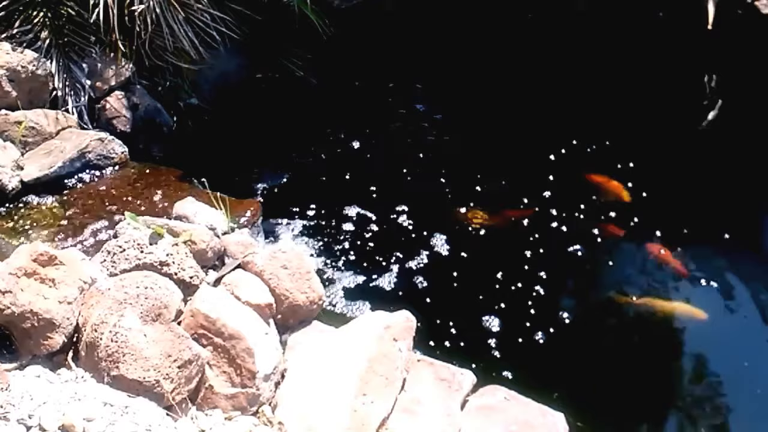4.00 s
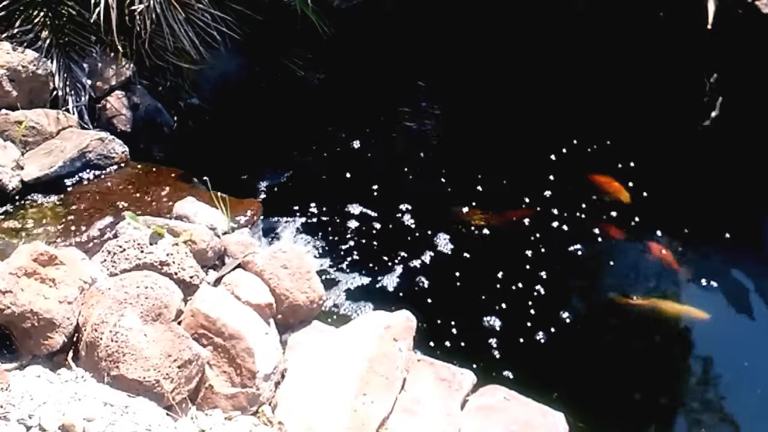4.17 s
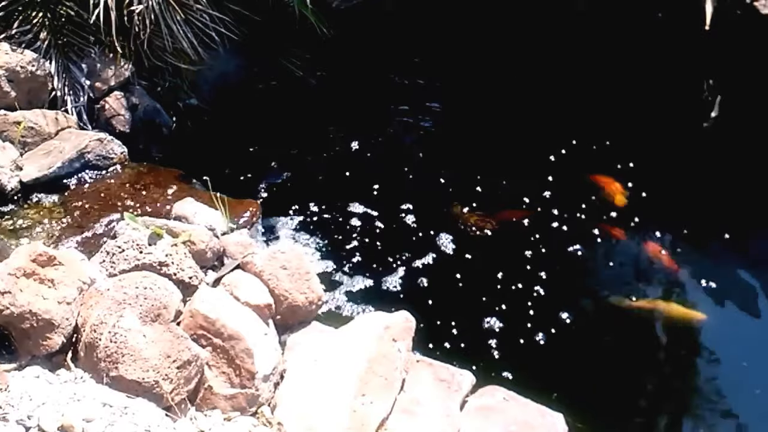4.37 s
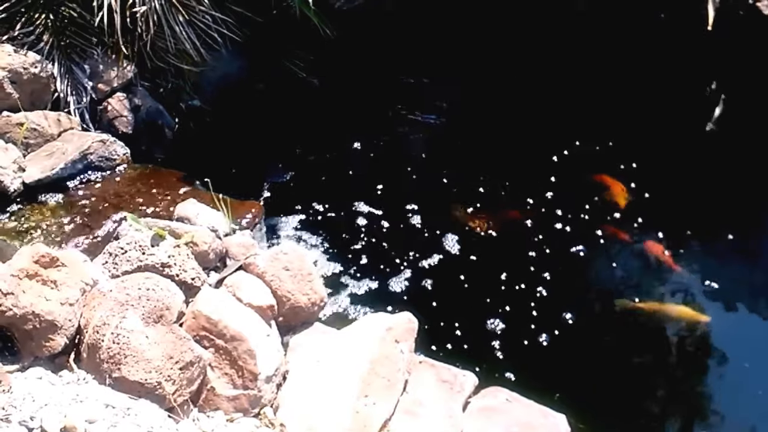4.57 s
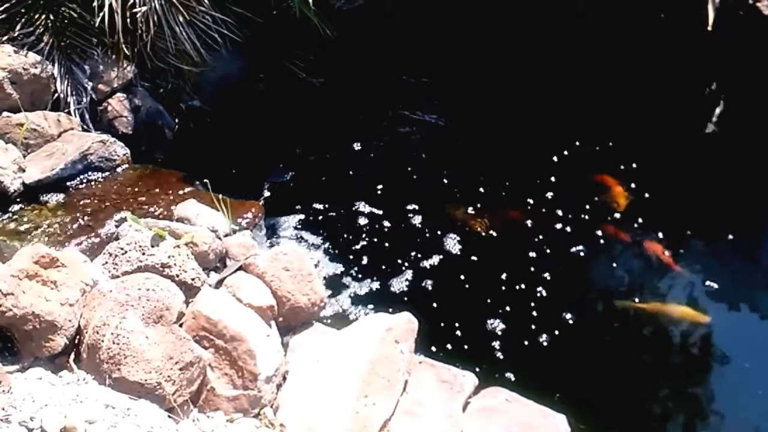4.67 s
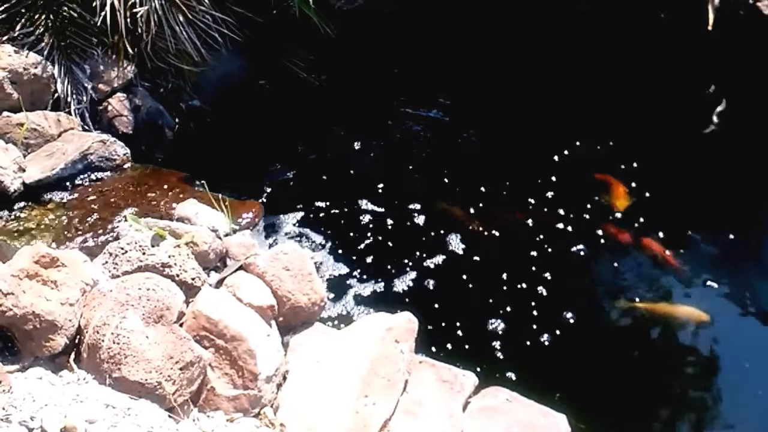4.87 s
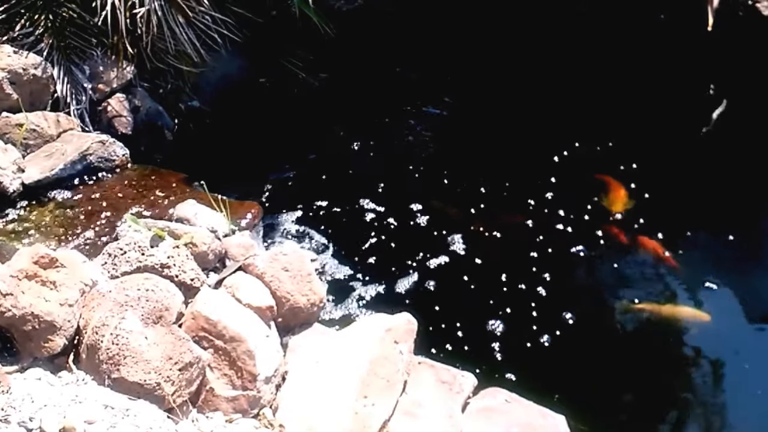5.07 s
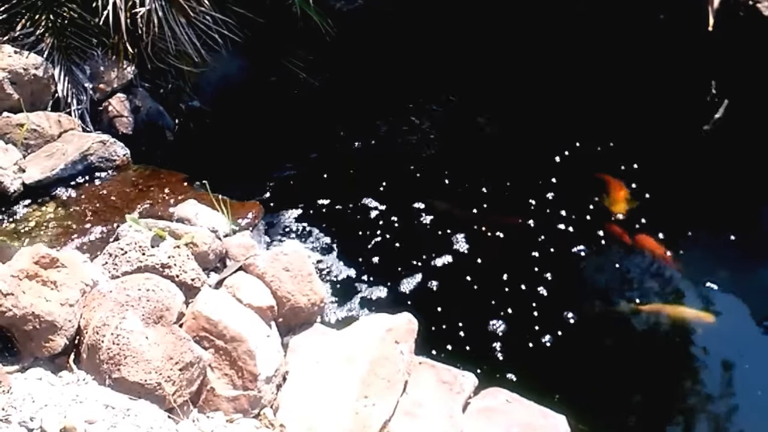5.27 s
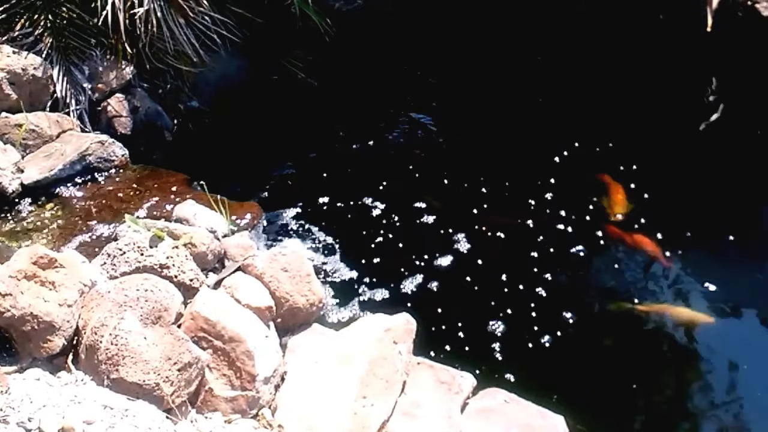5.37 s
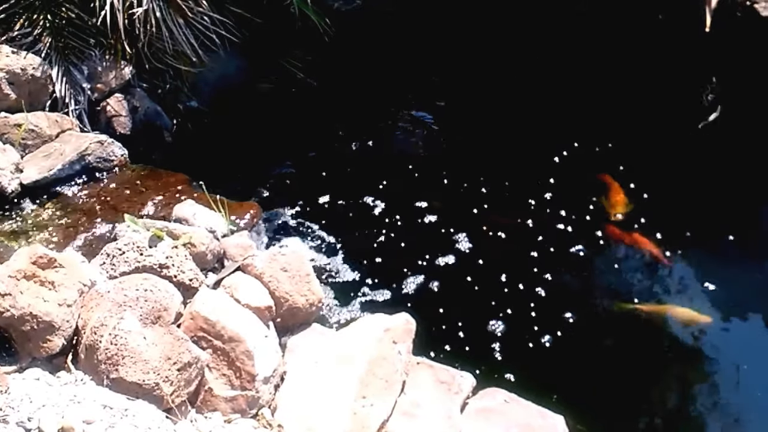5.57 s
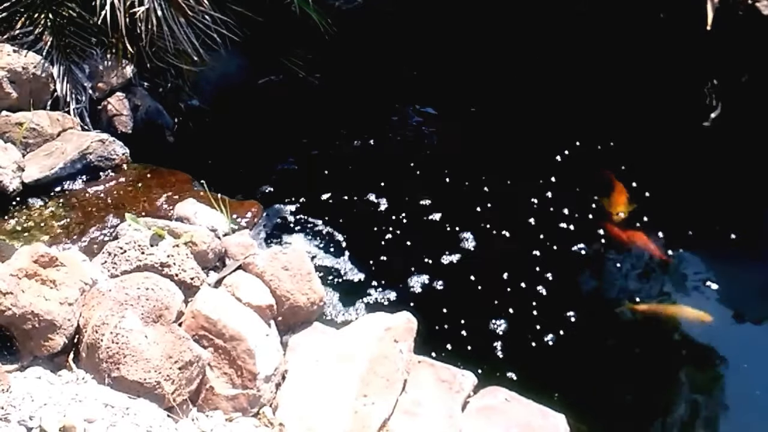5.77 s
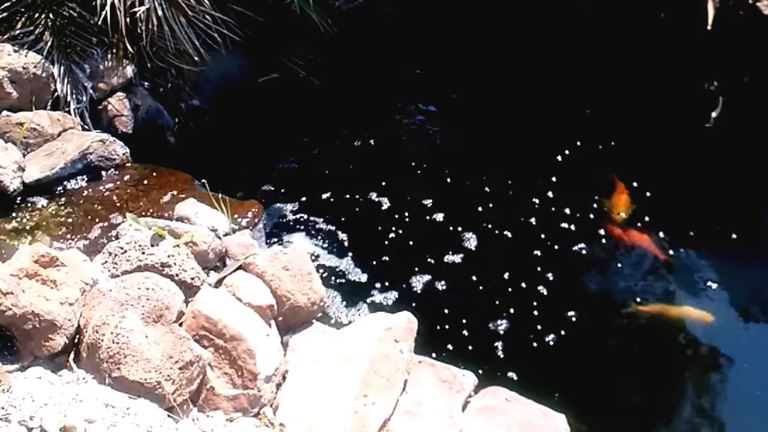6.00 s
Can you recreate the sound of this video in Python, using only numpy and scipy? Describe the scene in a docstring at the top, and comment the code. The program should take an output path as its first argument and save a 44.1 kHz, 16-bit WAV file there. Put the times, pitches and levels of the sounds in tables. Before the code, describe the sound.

Water runs constantly into a pond, gurgling and splashing without pause, dotted with round bubble tones, quick drop bursts and weak hissing spray. Strong low wind thumps and flutter cover the opening, then thin out near three seconds, leaving the water clearer, with milder gusts afterwards. Outdoors, fairly near the water, captured by a dull small camera microphone in mono.

```python
"""A small garden waterfall rushes and gurgles over rocks into a pond, with plops, bursting drops and windy rumble.
The water is noise mixed with swarms of small ringing bubbles; larger bubbles are single rising tones.
Drops burst as short puffs of noise; wind buffets, flutters and thumps at the microphone.
The small camera microphone is dull: it samples slowly and joins its samples by straight lines,
which leaves faint mirror bands in the treble."""
import sys
import numpy as np
from scipy import signal
from scipy.fft import rfft, irfft, next_fast_len
from scipy.io import wavfile
from scipy.ndimage import uniform_filter1d

SR = 44100
rng = np.random.default_rng(int(sys.argv[2]) if len(sys.argv) > 2 else 0)


def pcm_store(signal):
    """Save signal as 16-bit PCM."""
    levels = np.round(np.clip(np.atleast_2d(signal), -1, 1) * 32767)
    wavfile.write(sys.argv[1], SR, levels.astype(np.int16).T)


def decibels_to_gain(level_db):
    """Convert a level in decibels to a linear amplitude gain (20 dB per decade)."""
    exponent = np.asarray(level_db, float) / 20
    return 10 ** exponent


N = 266099   # length in samples

# how strongly the water falls: (t/s, splash level/dB, churn level/dB)
FALL_LEVELS = [(0.0, -49, -46.5), (0.72, -49, -43), (1.0, -50, -45.5), (1.25, -49.5, -42),
               (1.8, -49.5, -41), (2.2, -48.5, -43), (2.55, -47.5, -40), (3.0, -48, -40.5),
               (3.6, -47.5, -40.5), (4.3, -49, -43.5), (5.2, -49.5, -45), (6.03, -49, -44)]
MIST_DB = -74


def waterfall():
    """Falling water churns the pool, splashes on rocks and throws a steady mist and surges of spray."""
    splash_db, churn_db = in_time(FALL_LEVELS)
    body = decibels_to_gain(churn_db) * churn() + decibels_to_gain(splash_db) * splash()
    spray = decibels_to_gain(MIST_DB) * mist() + surge_strength() * surge_spray()
    return body + spray


# colour of the low churn: (f/Hz, relative level/dB per Hz)
CHURN_COLOUR = [(65, -42.5), (110, 1), (193, -1.5), (252, -0.5), (600, -14.5), (780, -53), (1320, -120)]


def churn():
    """Water plunging into the pool stirs low noise and traps large, low bubbles."""
    bubbles = swarm(100, 650, 200.0, cycles=35.0, size_db=0.8, clump_db=0.37)
    return water(CHURN_COLOUR, bubbles, share=0.4, patchy_db=1.6)


# colour of the splashing: (f/Hz, relative level/dB per Hz)
SPLASH_COLOUR = [(260, -43), (450, -3), (611, -4), (765, -2), (922, -7.5), (1100, -7), (1450, -9),
                 (1740, -17.5), (2200, -38), (2860, -62.5), (4840, -120)]


def splash():
    """Water breaking on the rocks makes noise and short bubble rings, with longer gurgles among them."""
    bubbles = swarm(414.4, 2410, 300.0, cycles=30.0, size_db=1.5, clump_db=2.5)
    gurgles = swarm(420, 2300, 150.0, cycles=88.0, size_db=1.0, clump_db=1.5)
    return water(SPLASH_COLOUR, bubbles + decibels_to_gain(-6.0) * gurgles, share=0.4, patchy_db=1.7)


# colour of the steady mist: (f/Hz, relative level/dB per Hz)
MIST_COLOUR = [(1120, -30), (1900, -6), (2190, -11.5), (2290, -10), (2480, -6.5), (3050, -4.5), (3960, -9),
               (6710, -120)]


def mist():
    """Steady fine spray: a high hiss with tiny, long-ringing bubbles in it."""
    bubbles = swarm(1800, 4300, 300.0, cycles=220.0, size_db=-1.0, clump_db=0.0)
    return water(MIST_COLOUR, bubbles, share=0.28, patchy_db=2.0)


# colour of the surging spray: (f/Hz, relative level/dB per Hz)
SURGE_HUE = [(2200, -10.5), (2700, -10), (3100, -3), (3500, -8.5), (4000, -10)]


def surge_spray():
    """The spray thrown in surges: hiss and tiny ringing bubbles, before the surges shape its strength."""
    bubbles = swarm(2100, 4200, 250.0, cycles=130.0, size_db=1.0, clump_db=0.5)
    return water(SURGE_HUE, bubbles, share=0.45, patchy_db=0.5)


# surges of fine spray: (crest t/s, level/dB, build-up by a factor e t/s, dying by 60 dB t/s)
SPRAY_SURGES = [(0.19, -74, 0.035, 0.42), (0.74, -72.5, .03, 0.36), (0.9, -76.5, 0.025, .5),
                (1.04, -66.5, .015, 0.7), (1.408, -68.5, 0.054, 0.18), (2.0, -68.5, 0.069, 0.46),
                (2.2, -72, 0.016, .6), (2.24, -66.5, 0.017, 0.98), (2.53, -70, 0.031, 1),
                (3.35, -68, .015, 0.52), (3.419, -74, 0.036, 1.3), (3.749, -71, 0.15, 1),
                (4.06, -69.5, 0.065, 0.33), (4.38, -80, 0.022, 0.25), (4.54, -67.5, 0.059, 0.45),
                (4.83, -73, .04, 0.51), (5.04, -71.5, 0.023, 0.22), (5.51, -67, 0.035, 0.45),
                (5.629, -70.5, 0.032, 0.36), (5.89, -75, .07, 0.73)]


def surge_strength():
    """Each surge of spray builds up to its crest and dies away; overlapping surges add in power."""
    t = np.arange(N) / SR
    power = np.zeros(N)
    for crest, db, build_s, t60 in SPRAY_SURGES:
        rising = np.exp(2 * np.minimum(t - crest, 0) / build_s)
        dying = decibels_to_gain(-120 * np.maximum(t - crest, 0) / t60)
        power += decibels_to_gain(2 * db) * np.where(t < crest, rising, dying)
    return np.sqrt(power)


def water(spectrum, bubbles, share, patchy_db):
    """Rushing noise of wavering strength and a bubble swarm share one colour; share is the bubbles' power."""
    share = np.clip(share, 0, 1)
    rush = rng.standard_normal(N) * decibels_to_gain(patchy_db * drift(1.6))
    return np.sqrt(1 - share) * colour(rush, spectrum) + np.sqrt(share) * colour(bubbles, spectrum)


def swarm(low_hz, high_hz, per_s, cycles, size_db, clump_db):
    """Small bubbles born at random in clumps; each falls 60 dB in the given cycles; equal power per Hz."""
    sizes = decibels_to_gain(size_db * np.minimum(rng.exponential(1, N), 5)) * rng.choice([-1, 1], N)
    born = rng.random(N) < per_s * decibels_to_gain(clump_db * drift(9.0)) / SR
    pitch_number = rng.integers(0, 24, N)
    out = np.zeros(N)
    for k, hz in enumerate(np.geomspace(low_hz, high_hz, 24)):
        r = decibels_to_gain(-60 * hz / (cycles * SR))   # decay in one sample
        w = 2 * np.pi * hz / SR
        kicks = sizes * born * (pitch_number == k) + 1e-18
        ring = signal.lfilter([1, 0, -1], [1, -2 * r * np.cos(w), r * r], kicks)
        out += rms_one(ring) * np.sqrt(hz)   # the pitches lie further apart higher up
    return rms_one(out)


# larger bubbles and plops: (t/s, peak level/dB, starting f/Hz)
LARGE_BUBBLES = [(0.093, -41, 305), (0.292, -46.5, 1024), (0.34, -43, 336), (0.4045, -44, 1180),
                 (0.624, -39, 212), (0.6569, -44.5, 1170), (0.7183, -38, 1197), (0.727, -38, 688),
                 (1.0114, -41.5, 1380), (1.035, -38.5, 1094), (1.889, -33, 223), (1.895, -43.5, 810),
                 (2.068, -44.5, 243), (2.2438, -50.5, 2305), (2.317, -37.5, 244), (2.396, -38, 448),
                 (2.52, -39, 244), (2.7626, -47, 946), (2.789, -43, 199), (2.813, -44, 670),
                 (2.8534, -44, 1050), (2.973, -36, 249), (3.1492, -43.5, 1090), (3.5648, -46, 1020),
                 (3.6227, -44, 1260), (3.759, -48, 1020), (3.787, -46, 550), (4.0204, -37, 1412),
                 (4.0257, -39.5, 1270), (4.04, -38.5, 488), (4.411, -51, 250), (4.6578, -43.5, 1076),
                 (4.784, -41.5, 547), (4.8698, -42, 1323), (4.933, -39, 830), (4.9497, -44, 993),
                 (4.986, -37, 299), (5.047, -36, 300), (5.0325, -57.5, 3020), (5.1534, -48, 1340),
                 (5.332, -46, 440), (5.364, -38, 283), (5.5, -42, 785), (5.7568, -47.5, 1710),
                 (5.837, -41.5, 325), (5.9254, -50, 1530)]
RING_S_AT_1K, RING_SLOPE = 0.041, 0.37   # time to fall 60 dB at 1 kHz; lower bubbles ring longer
ONSET_CYCLES = 4.0   # time constant of the soft onset


def plops(glide_per_s=0.35):
    """Each larger bubble is a ringing tone with a soft onset that rises slightly in pitch."""
    out, t = np.zeros(N + SR), np.arange(SR // 4) / SR
    for s, db, hz in LARGE_BUBBLES:
        t60 = RING_S_AT_1K * (1000 / hz) ** RING_SLOPE
        shape = (1 - np.exp(-t * hz / ONSET_CYCLES)) * decibels_to_gain(-60 * t / t60)
        tone = np.sin(2 * np.pi * hz * (t + glide_per_s * t * t / 2))
        at = round((s - ONSET_CYCLES / 2 / hz) * SR)   # a little before its listed time: the onset is soft
        out[at:at + len(t)] += decibels_to_gain(db) * shape / shape.max() * tone
    return out[:N]


# drops that burst on stone or water: (t/s, peak level/dB, centre f/Hz, dying by 60 dB t/s)
BURSTING_DROPS = [(0.75, -62.5, 3100, 0.072), (0.8945, -41.5, 1440, 0.1), (0.8989, -66, 3220, 0.072),
                  (1.029, -39.5, 1340, 0.062), (1.0331, -56, 2770, 0.044), (1.05, -59, 3010, 0.085),
                  (1.0794, -64, 2900, 0.08), (1.394, -61, 3610, 0.34), (1.9954, -49.5, 1520, 0.021),
                  (2.1839, -62, 3080, 0.068), (2.2094, -58, 2930, 0.06), (2.225, -35.5, 510, 0.034),
                  (2.2314, -58.5, 2350, 0.06), (2.2338, -57, 3160, 0.093), (2.2408, -56, 3020, 0.087),
                  (2.2473, -44, 1336, 0.023), (3.1708, -52, 1510, 0.047), (3.344, -55, 3100, 0.046),
                  (3.4555, -60, 3050, 0.2), (4.5423, -64, 2990, 0.065), (4.8695, -39.5, 1340, 0.04),
                  (5.234, -64, 2850, 0.089), (5.293, -40.5, 1240, 0.23), (5.6984, -49, 1280, 0.025),
                  (5.7568, -46, 1500, 0.03), (5.9243, -40, 1505, 0.07), (6.028, -53, 3150, 0.06)]
SPLAT_WIDTH_HZ = 600


def splats(rise_s=0.003):
    """A bursting drop is a puff of noise around the pitch of the cavity that it opens."""
    out, t = np.zeros(N + SR), np.arange(SR // 4) / SR
    half_hz = SPLAT_WIDTH_HZ / 2
    for s, db, hz, t60 in BURSTING_DROPS:
        puff = rng.standard_normal(len(t)) * (1 - np.exp(-t / rise_s)) * decibels_to_gain(-60 * t / t60)
        band = signal.butter(4, [max(hz - half_hz, 50), hz + half_hz], "band", fs=SR, output="sos")
        burst = signal.sosfilt(band, puff)
        at = round((s - rise_s - 1 / SPLAT_WIDTH_HZ) * SR)   # the band takes a moment to speak
        out[at:at + len(t)] += decibels_to_gain(db) * burst / np.abs(burst).max()
    return out[:N]


# wind at the microphone: (t/s, buffeting level/dB, flutter level/dB)
WIND_LEVELS = [(0.0, -27, -31.5), (0.3, -33, -29.5), (0.6, -26, -30), (0.84, -28.5, -24),
               (0.95, -27, -37.5), (1.3, -31, -30.5), (1.76, -28.5, -31.5), (2.1, -28, -29.5),
               (2.25, -31, -40.5), (3.1, -39.5, -42.5), (3.45, -32, -34), (3.8, -29.5, -35),
               (4.0, -35.5, -40), (4.5, -36, -40.5), (5.3, -31, -41), (6.03, -31, -42)]
# colour of the deep buffeting: (f/Hz, relative level/dB per Hz)
BUFFET_COLOUR = [(2.9, -32.5), (5.0, 3), (14, 4), (27, 16.5), (60, -11.5), (78, -33.5), (130, -120)]
# colour of the faster flutter: (f/Hz, relative level/dB per Hz)
FLUTTER_COLOUR = [(24, -36), (40, 0.5), (97, -6), (134, -15.5), (220, -24), (290, -39), (480, -120)]
BREATH_DB, BREATH_HZ = 1.24, 4   # spread of the wind's uneven breaths, and corner of their low-pass


def wind():
    """Gusts press on the diaphragm: deep buffeting, a faster flutter and single thumps."""
    buffet_db, flutter_db = in_time(WIND_LEVELS)
    buffet = decibels_to_gain(buffet_db) * eddies(BUFFET_COLOUR, 0.12, 0.27)
    flutter = decibels_to_gain(flutter_db) * eddies(FLUTTER_COLOUR, 0.048, 0.35)
    breaths = decibels_to_gain(BREATH_DB * drift(BREATH_HZ))
    return breaths * (buffet + flutter) + thumps()


def eddies(spectrum, even_s, evenness):
    """Turbulent pressure whose chance swells are partly evened out, so that it follows the gust closely."""
    x = colour(rng.standard_normal(N), spectrum)
    window = int(even_s * SR)
    swell = uniform_filter1d(uniform_filter1d(x * x, window), window)
    return rms_one(x / (swell + 0.14) ** (evenness / 2))


# strong eddies that thump the diaphragm: (t/s, peak level/dB, f/Hz)
WIND_THUMPS = [(0.213, -21, 56.3), (0.305, -13.5, 45), (0.383, -20, 71.3), (0.44, -12.5, 74.4),
               (0.542, -17.5, 69), (0.67, -23, 50), (0.77, -15, 75), (0.825, -13, 57.6),
               (0.941, -19.5, 33.2), (1.208, -18, 30), (1.341, -24.5, 55.4), (1.48, -20, 51),
               (1.581, -19, 48.7), (1.709, -18, 39.2), (1.94, -19.5, 39.8), (2.045, -21.5, 47),
               (2.118, -23, 60.6), (2.248, -20.5, 49), (2.516, -21.5, 48.7), (2.874, -28.5, 39.7),
               (3.342, -30, 52), (3.478, -24, 63.3), (3.691, -20.5, 54.3), (3.818, -23.5, 47.3),
               (3.923, -23.5, 36.3), (4.253, -21, 37.3), (4.44, -25.5, 47), (4.725, -23, 44),
               (4.96, -22, 46.4), (5.32, -17, 37), (5.436, -25.5, 49), (5.637, -25.5, 37.6),
               (5.803, -23.5, 42)]
THUMP_CYCLES = 0.44   # half-width of a thump


def thumps():
    """A strong eddy pushes or pulls the diaphragm in one swing with small rebounds."""
    out, t = np.zeros(N + SR), np.arange(-SR // 10, SR // 10) / SR
    for s, db, hz in WIND_THUMPS:
        push_or_pull = rng.choice([-1, 1])
        swing = np.exp(-(t * hz / THUMP_CYCLES) ** 2) * np.cos(2 * np.pi * hz * t)
        at = round(s * SR) - SR // 10
        out[at:at + len(t)] += push_or_pull * decibels_to_gain(db) * swing
    return out[:N]


def rms_one(x):
    """Scale to an average strength (rms) of 1."""
    return x / np.sqrt(np.mean(x ** 2) + 1e-20)


def in_time(rows):
    """Draw straight lines between the rows of a table, to give each column one value a sample."""
    s, *columns = np.transpose(rows)
    return [np.interp(np.arange(N) / SR, s, c) for c in columns]


def colour(x, spectrum):
    """Give a flat signal the spectrum, falling steeply beyond its ends; rms 1."""
    size = next_fast_len(N)
    hz, db = np.transpose(spectrum)
    log_hz = np.log(hz)
    bins = np.log(np.maximum(np.arange(size // 2 + 1) * SR / size, 1))
    outside = np.maximum(log_hz[0] - bins, 0) + np.maximum(bins - log_hz[-1], 0)
    gain = decibels_to_gain(np.interp(bins, log_hz, db) - 60 * outside)
    return rms_one(irfft(rfft(x, size) * gain, size)[:N])


def drift(rate_hz):
    """Slow random wandering of rms 1: noise through two equal one-pole low-passes at rate_hz."""
    r = np.exp(-80 * np.pi * rate_hz / SR)   # computed at every 40th sample
    noise = rng.standard_normal(N // 40 + 2002)
    slow = signal.lfilter([1], [1, -2 * r, r * r], noise)[2000:]   # skip the filter's start
    return np.interp(np.arange(N) / 40, np.arange(len(slow)), rms_one(slow))


def scene():
    """Waterfall, plops, splats and wind add up at one microphone."""
    return (waterfall() + plops() + splats() + wind())[None]


CAMERA_RATE_HZ, CAMERA_TOP_HZ = 12000, 4058
FADE_S = 0.003


def camera_microphone(x):
    """A steep low-pass dulls the sound; slow samples joined by straight lines leave faint mirror bands."""
    margin = 1470   # samples for the filters to run in and out
    padded = np.pad(x, margin, mode="reflect", reflect_type="odd")
    low_pass = signal.ellip(12, .5, 90, CAMERA_TOP_HZ, fs=SR, output="sos")
    dull = signal.sosfilt(low_pass, padded)
    samples = signal.resample_poly(dull, CAMERA_RATE_HZ, SR)
    return np.interp((np.arange(N) + margin) / SR, np.arange(len(samples)) / CAMERA_RATE_HZ, samples)


def band_limit(x):
    """A steep low-pass at the top of the band."""
    return signal.sosfilt(signal.butter(12, 13800, fs=SR, output="sos"), x)


def record(dry):
    """The camera microphone picks up the scene; a short fade softens both ends."""
    heard = camera_microphone(dry[0])
    to_edge = np.minimum(np.arange(N), np.arange(N)[::-1]) / SR
    fade = np.sin(np.pi / 2 * np.minimum(to_edge / FADE_S, 1)) ** 2
    mix = (heard * fade)[None]
    return band_limit(mix)


dry = scene()
out = record(dry)
pcm_store(out)
```